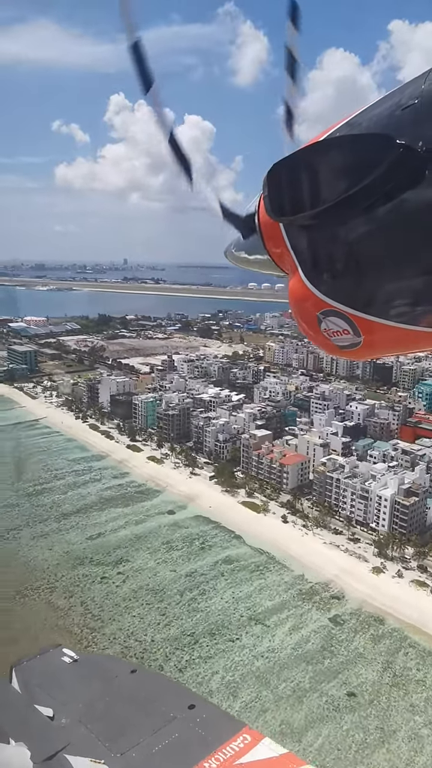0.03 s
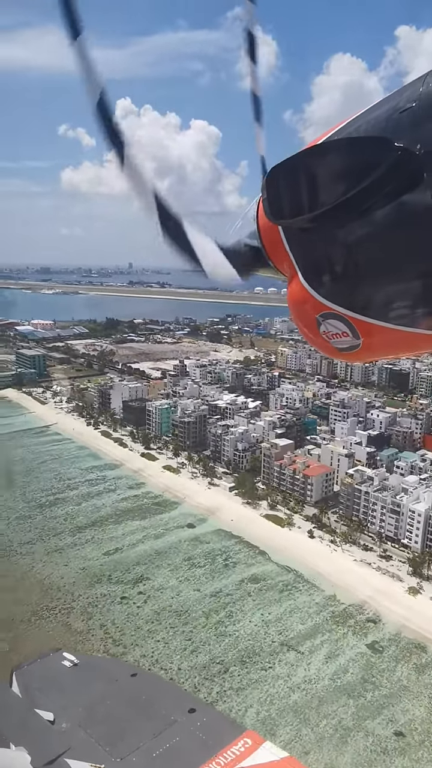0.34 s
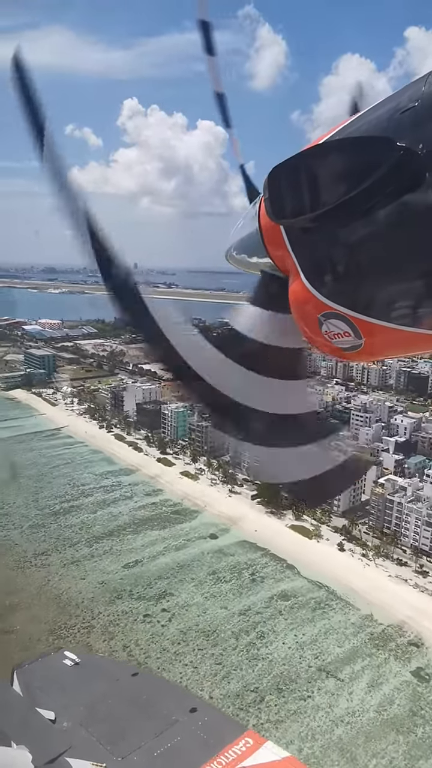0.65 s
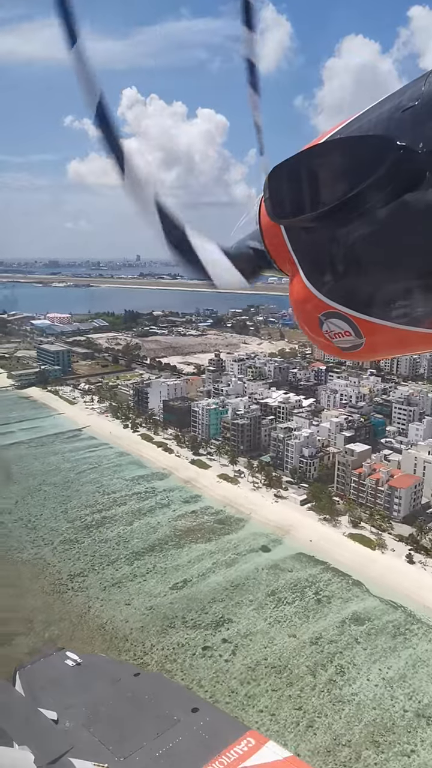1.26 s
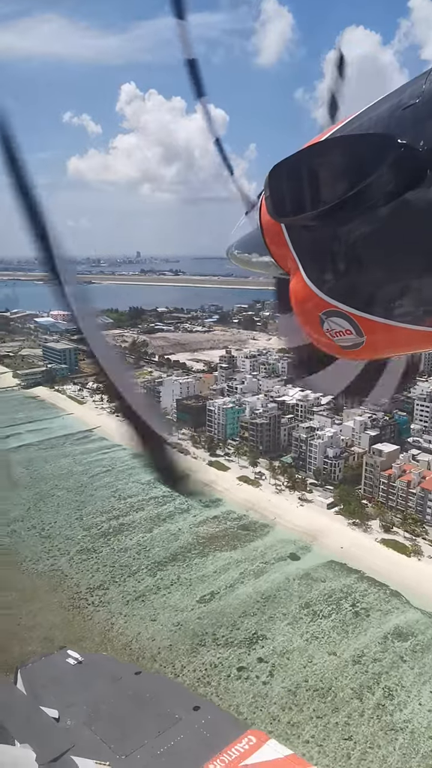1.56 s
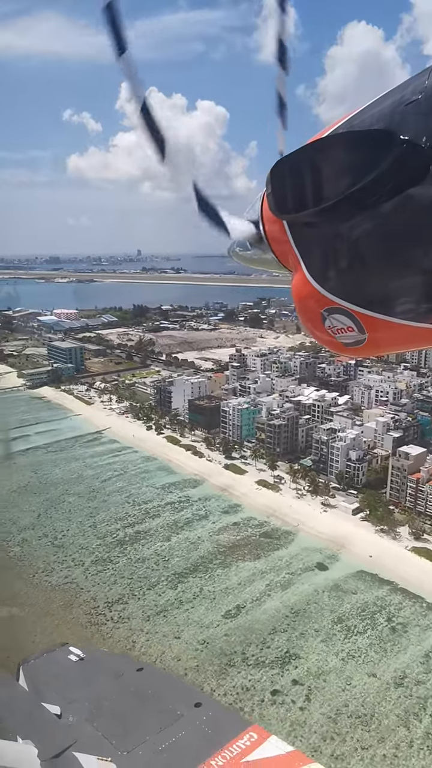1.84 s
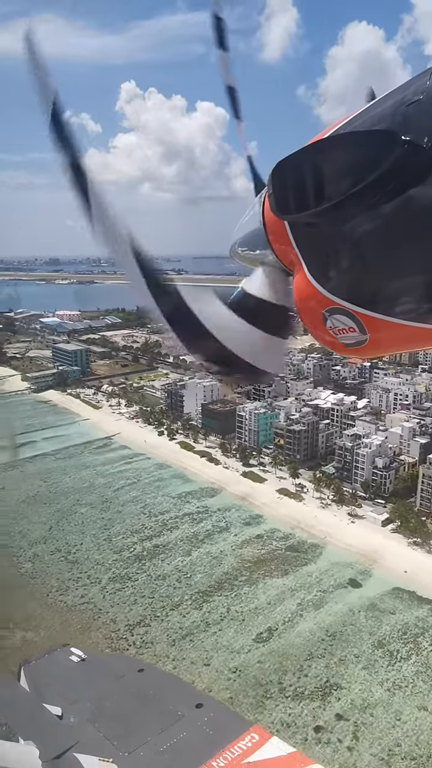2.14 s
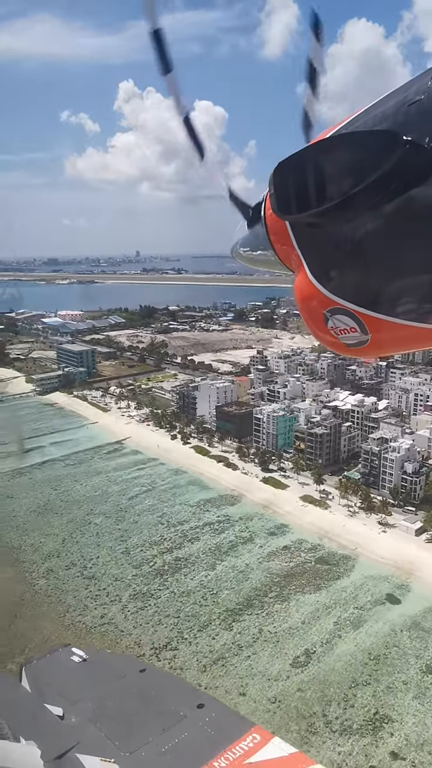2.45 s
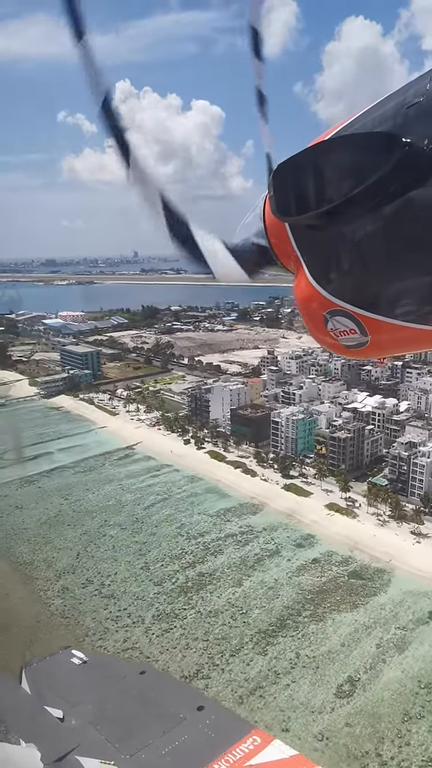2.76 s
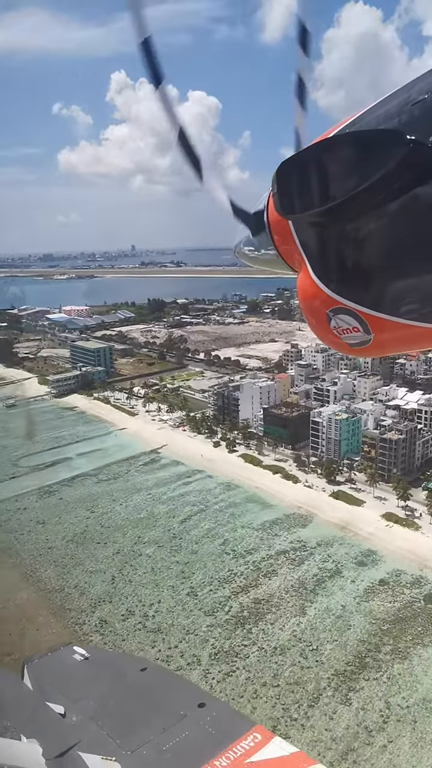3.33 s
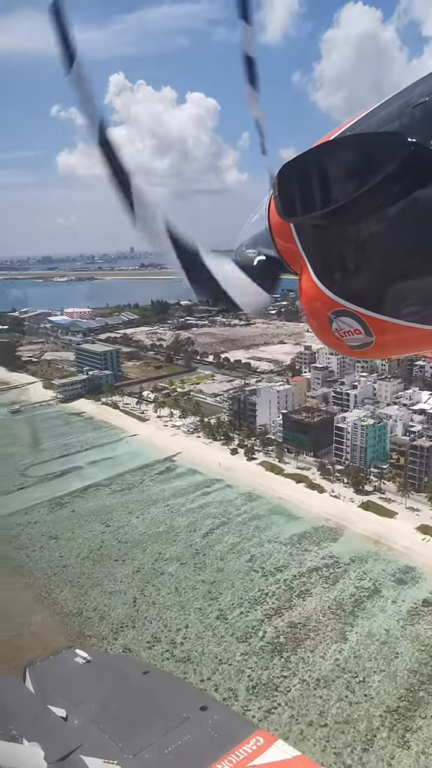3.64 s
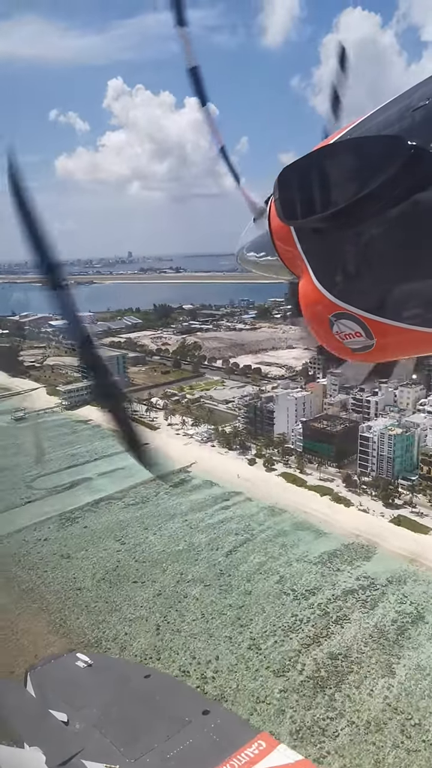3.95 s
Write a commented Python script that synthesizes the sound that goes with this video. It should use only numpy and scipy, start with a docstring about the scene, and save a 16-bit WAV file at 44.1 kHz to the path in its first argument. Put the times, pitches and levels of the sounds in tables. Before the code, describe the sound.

A steady, throbbing propeller drone with rushing air, heard inside a small seaplane in flight.

```python
"""Two propellers drone, heard inside the cabin of a turboprop seaplane in steady flight.
Each passing blade sends a push of air into the cabin. One propeller makes about one more push
a second than the other, so the drone throbs. Air rushing along the hull roars and rings in the
cabin, its highest hiss pulses with the blades, and the turbines whine faintly behind it.
A compressor turns the sound down whenever the blades fall into step."""
import sys
import numpy as np
from scipy import signal
from scipy.fft import rfft, irfft
from scipy.io import wavfile
from scipy.ndimage import uniform_filter1d, minimum_filter1d

SR = 44100
rng = np.random.default_rng(int(sys.argv[2]) if len(sys.argv) > 2 else 0)


def bounce(signal):
    """Save signal as a 16-bit WAV file at the path given by the first command-line argument."""
    frames = np.transpose(np.atleast_2d(signal))
    limited = np.clip(frames, -1, 1)
    pcm = np.round(limited * 32767).astype(np.int16)
    wavfile.write(sys.argv[1], SR, pcm)


N = 176400
TIME = np.arange(N) / SR
FLUTTER_HZ = 4.6   # how quickly the tones waver


# The drone's tones, at 1, 2, 3... times the blade rate:
# (slower propeller [dB], faster propeller [dB], left minus right [dB], flutter [share of the tone])
DRONE_TONES = [(-21, -24, -2, 0.086), (-24, -16, -1.1, 0.073), (-20, -27.5, -3, 0.12),
               (-37, -48.5, 0, 0.53), (-39, -39.5, -3, 0.76), (-46.5, -41.5, 1, 0.37)]

def propellers(slower, faster):
    """The blades' regular pushes make a stack of tones; churning air makes each one flutter."""
    drone = np.zeros((2, N))
    for multiple, (slower_db, faster_db, pan_db, flutter) in enumerate(DRONE_TONES, 1):
        for passes, db in ((slower, slower_db), (faster, faster_db)):
            # A complex number lets both the loudness and the timing sway.
            sway = 1 + flutter * (drift(FLUTTER_HZ) + 1j * drift(FLUTTER_HZ)) / np.sqrt(2)
            tone = np.sqrt(2) * np.real(sway * np.exp(2j * np.pi * multiple * passes))
            drone += from_db([[db + pan_db / 2], [db - pan_db / 2]]) * tone
    return drone


# How often a blade goes by: (time [s], slower propeller [Hz], faster propeller [Hz])
BLADE_RATES = [(0, 87.53, 88.53), (.8, 87.27, 88.15), (1.6, 86.89, 87.96), (2.4, 87.02, 88.14),
               (3.2, 87.09, 88.17), (4, 87.05, 88.28)]

def blade_passes(out_of_step_s=2.1565):
    """Counts each propeller's passing blades; at out_of_step_s the two are half a pass apart."""
    times, *rates = np.transpose(BLADE_RATES)
    counts = [np.cumsum(np.interp(TIME, times, rate)) / SR for rate in rates]
    slower, faster = [count - np.interp(out_of_step_s, TIME, count) for count in counts]
    return slower + .5, faster


# Rushing air before the cabin colours it: (pitch [Hz], left level [dB per Hz], right level [dB per Hz])
AIR_LEVELS = [(20, -60, -55), (27, -47, -49), (36, -50, -53), (46, -50, -42), (76, -44, -41),
              (108, -46, -48.5), (150, -46.5, -46), (233, -45, -41), (302, -52, -49), (415, -52.5, -53),
              (550, -59, -54.5), (1080, -63.5, -60), (1513, -65.5, -55), (1727, -63.5, -61),
              (1830, -72, -65), (2300, -61, -64), (2900, -72.5, -65), (3650, -74, -65.5),
              (4200, -75.5, -72), (4710, -70, -69.5), (5260, -78, -78), (6100, -77.5, -79.5),
              (6650, -79, -74.5), (7520, -76.5, -78), (7900, -79.5, -87), (8550, -78, -90),
              (9100, -73.5, -89), (9550, -75, -81), (9900, -82.5, -82.5), (10850, -83.5, -81),
              (12500, -87, -87), (14500, -90, -92), (15500, -95, -100)]
# How alike the air sounds at the two ears: (pitch [Hz], likeness [1 same, 0 unrelated, -1 opposite])
EAR_LIKENESS = [(60, 0.94), (270, 0.84), (450, .82), (740, 0.39), (1220, -0.29), (2010, -0.25),
                (5000, -0.035)]

def slipstream(passes, hiss_from_hz=9400, pulse_depth=.4, gust_db=.25, gust_hz=6.6):
    """Air rushes along the hull with a roar; its high hiss swells with each passing blade."""
    hz = np.maximum(np.fft.rfftfreq(N, 1 / SR), 1)
    shared, opposite = rfft(rng.standard_normal((2, N)))
    alike = at_hz(EAR_LIKENESS, hz)
    noise = np.sqrt(1 + alike) * shared + np.sqrt(1 - alike) * opposite * [[1], [-1]]
    level_db = at_hz(AIR_LEVELS, hz) + cabin_ringing(hz) + cabin_ripple(hz)
    bass_cut = np.minimum(hz / 20, 1) ** 2   # fades below 20 Hz
    air = noise * from_db(level_db) * np.sqrt(SR) / 2 * bass_cut
    hiss_share = 1 / (1 + (hiss_from_hz / hz) ** 8)
    roar = irfft(air * (1 - hiss_share), N)
    hiss = irfft(air * hiss_share, N)
    gusts = from_db(gust_db * drift(gust_hz))
    pulse = (.5 + .5 * np.cos(2 * np.pi * passes)) ** 3   # cubing narrows each swell
    return roar * gusts + hiss * (1 + pulse_depth * (pulse - pulse.mean()))


# The cabin's peaks and dips: (pitch [Hz], width [Hz], left boost [dB], right boost [dB])
CABIN_RESONANCES = [(461, 25, 3.5, 2), (720, 80, 4.5, 3.5), (862, 49, -3, 4), (962, 112, 5.5, 8.5),
                    (1109, 23, 5, 7.5), (1192, 25, 6, 2), (1247, 51, -4, 7), (1324, 86, -1.5, 8),
                    (1510, 25, 7, 1.5), (1577, 62, 5, 5), (2200, 21, -5, 2), (2256, 130, -6.5, -4),
                    (8200, 200, 1.5, 5), (10400, 250, -1, 1)]

def cabin_ringing(hz):
    """The cabin rings at some pitches, boosting or weakening them at each ear, in dB."""
    return sum(np.array([[left_db], [right_db]]) / (1 + (2 * (hz - centre_hz) / width_hz) ** 2)
               for centre_hz, width_hz, left_db, right_db in CABIN_RESONANCES)


def cabin_ripple(hz, depth_db=1.1, width_hz=21, from_hz=2500):
    """The cabin's many high resonances add narrow random peaks and dips at each ear, in dB."""
    width_bins = width_hz * N / SR
    bell = np.exp(-(2 * np.arange(-400, 401) / width_bins) ** 2)
    bumps = signal.fftconvolve(rng.standard_normal((2, len(hz))), bell[None], "same", axes=1)
    treble_share = hz ** 2 / (hz ** 2 + from_hz ** 2)
    return depth_db * bumps / bumps.std() * treble_share


# Turbine, gear and accessory tones: (pitch [Hz], left level [dB], right level [dB], pitch wander [Hz])
ENGINE_WHINES = [(451, -48, -41.5, 1.2), (2495, -57, -50, 3), (2555, -56, -57, 4), (2988, -64, -56, 3),
                 (3085, -66, -56, 3), (3165, -66, -57, 3), (4520, -68, -59, 8), (4640, -59, -61, 15),
                 (5620, -67, -66, 8), (6590, -72, -63, 5), (7214, -64, -62, 4), (7305, -64, -62, 4),
                 (7499, -57, -58, 3), (8610, -67, -74, 4), (8872, -62, -74, 4), (8945, -64, -75, 4),
                 (9103, -63, -65, 6)]
# The strongest high whine dips, then swells early on: (time [s], level change [dB])
WHINE_SWELL = [(0, -1), (.65, -5), (1.0, 2.5), (1.4, 2), (4, -2)]

def engine_whines():
    """The engines' fast shafts and gears each sing a thin tone."""
    swell = from_db(np.interp(TIME, *np.transpose(WHINE_SWELL)))
    strongest = swell * whine(hz=2465.5, left_db=-43, right_db=-50, wander_hz=2)
    return strongest + sum(whine(*row) for row in ENGINE_WHINES)


def whine(hz, left_db, right_db, wander_hz, waver_rate_hz=12, shimmer_db=4):
    """One thin wavering tone that shimmers separately at each ear."""
    turns = np.cumsum(hz + wander_hz * drift(waver_rate_hz)) / SR
    ears = []
    for db in (left_db, right_db):
        loudness = from_db(db + shimmer_db * drift(waver_rate_hz))
        ears.append(loudness * np.sin(2 * np.pi * turns + .5 * drift(FLUTTER_HZ)))
    return np.array(ears)


def drift(rate_hz):
    """A smooth random wobble, typically about 1 in size."""
    step, warm_up = 40, 2000   # one value every 40 samples; the first 2000 values are dropped
    memory = np.exp(-2 * np.pi * rate_hz * step / SR)
    noise = rng.standard_normal(N // step + warm_up + 2)
    slow = signal.lfilter([1], [1, -2 * memory, memory ** 2], noise)[warm_up:]
    return np.interp(np.arange(N) / step, np.arange(len(slow)), slow / slow.std())


def from_db(db):
    """Turns decibels into a number to multiply the sound by."""
    return 10 ** (np.asarray(db) / 20)


def at_hz(table, hz):
    """Reads between a table's rows, giving every octave equal room."""
    known_hz, *columns = np.transpose(table)
    return np.array([np.interp(np.log(hz), np.log(known_hz), column) for column in columns])


def compressor(sound, from_level_db=-8.5, squeeze=.59, boost_db=3.5, attack_s=.011, release_db_per_s=29):
    """Turns loud moments down quickly, lets the volume creep back, and boosts the whole sound."""
    peak_db = 20 * np.log10(np.abs(sound).max(axis=0) + 1e-9)
    over_db = np.maximum(peak_db - from_level_db, 0)
    release_db = release_db_per_s * TIME
    held_db = np.maximum.accumulate(over_db + release_db) - release_db
    memory = np.exp(-1 / (attack_s * SR))
    smooth_db, _ = signal.lfilter([1 - memory], [1, -memory], held_db, zi=[memory * held_db.mean()])
    return sound * from_db(boost_db - squeeze * smooth_db)


def limiter(sound, ceiling=.93, window_samples=255):
    """Eases the volume down just ahead of any peak over the ceiling."""
    gain = np.minimum(ceiling / (np.abs(sound).max(axis=0) + 1e-9), 1)
    lowest_nearby = minimum_filter1d(gain, size=window_samples)
    return sound * uniform_filter1d(lowest_nearby, size=window_samples)


def scene():
    """Propellers, rushing air and engine whines at a window seat."""
    slower, faster = blade_passes()
    return propellers(slower, faster) + slipstream(slower) + engine_whines()


def record(dry):
    """Evens out the loudness, then cuts the treble above 15300 Hz."""
    treble_cut = signal.ellip(10, .1, 80, 15300, fs=SR, output="sos")
    return signal.sosfilt(treble_cut, limiter(compressor(dry)))


dry = scene()
out = record(dry)
bounce(out)
```